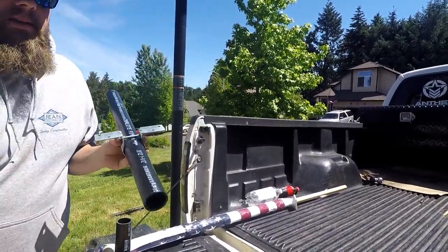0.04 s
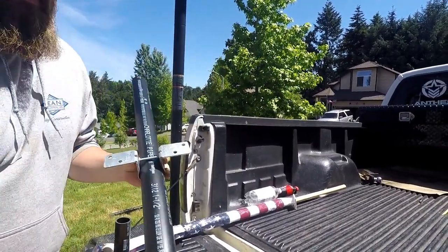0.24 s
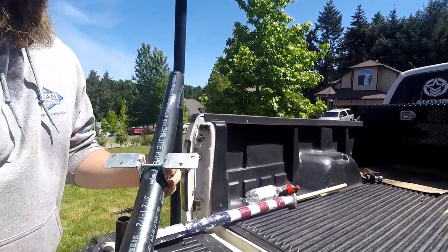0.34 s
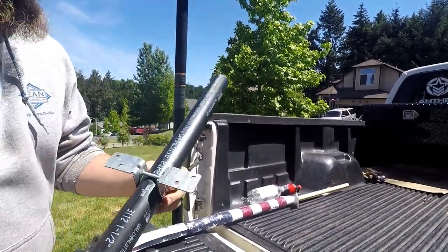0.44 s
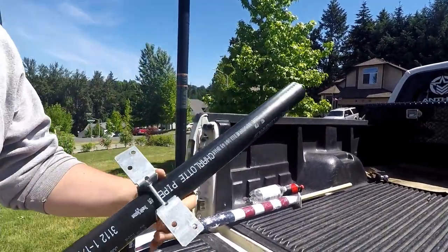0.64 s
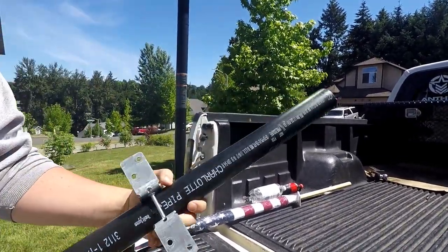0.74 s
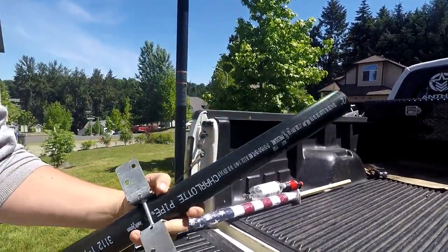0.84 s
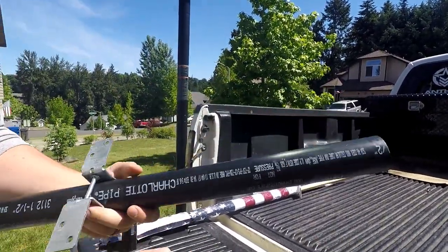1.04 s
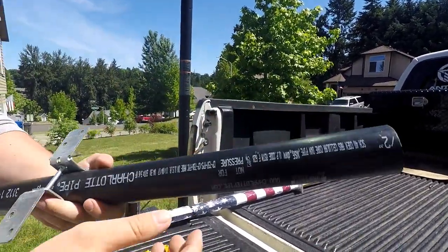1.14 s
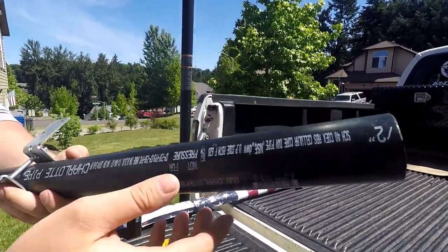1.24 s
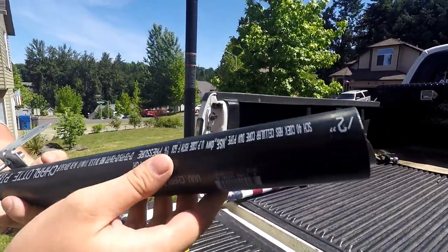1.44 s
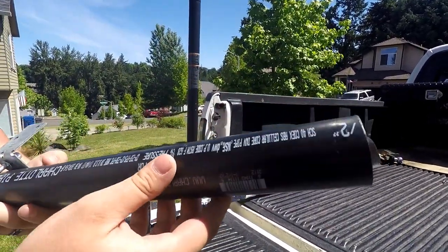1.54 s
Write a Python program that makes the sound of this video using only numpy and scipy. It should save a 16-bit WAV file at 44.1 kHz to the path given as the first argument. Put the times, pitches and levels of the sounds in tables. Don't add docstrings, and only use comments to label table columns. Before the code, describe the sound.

A hollow plastic pipe knocks sharply once, then clatters in a short run of scraping knocks outdoors.

```python
import sys
import numpy as np
from scipy import signal
from scipy.fft import rfft, irfft, next_fast_len
from scipy.io import wavfile
from scipy.ndimage import uniform_filter1d, minimum_filter1d, map_coordinates

SR = 44100
rng = np.random.default_rng(int(sys.argv[2]) if len(sys.argv) > 2 else 0)


def undo_db(level):
    steps = np.asarray(level, float) / 20
    return 10 ** steps


def put_to_file(sound):
    columns = np.atleast_2d(sound).T
    safe = np.clip(columns, -1, 1)
    whole_steps = np.round(safe * 32767)
    wavfile.write(sys.argv[1], SR, whole_steps.astype(np.int16))


N = 70560
STRIKE_T = np.arange(SR // 4) / SR
CLICK_HZ = 5104

# [f/Hz, level/dB per Hz]
WALL_RATTLE = [(350, -3), (700, -9.5), (1600, -11.5), (3000, -17), (4000, -23), (5200, -21), (6900, -33.5),
               (15800, -70.5)]


def unit(x):
    return x / np.sqrt(np.mean(x ** 2) + 1e-20)


def wobble(rate):
    knots = rng.standard_normal(int(N * rate / SR) + 4)
    return map_coordinates(knots, [np.arange(N) * rate / SR])


def filtered(x, response):
    m = next_fast_len(len(x) + 8192)
    spectrum = rfft(x, m) * response(np.fft.rfftfreq(m, 1 / SR))
    return irfft(spectrum, m)[:len(x)]


def noise(points, size=N):
    f, db = np.transpose(points)

    def colour(hz):
        return undo_db(np.interp(np.log(hz + 1), np.log(f + 1), db))

    return unit(filtered(rng.standard_normal(size), colour))


def add(out, s, x):
    part = out[round(s * SR):][:len(x)]
    part += x[:len(part)]


def ring(modes, rise_s, blur=0.):
    hz, db, t60 = np.transpose(modes)[..., None]
    drift = blur * np.cumsum(rng.standard_normal((len(modes), len(STRIKE_T))), 1)
    scatter_db = 1.5 * rng.standard_normal(hz.shape)
    decay = undo_db(db + scatter_db - 60 * STRIKE_T / t60)
    tones = decay * np.sin(2 * np.pi * hz * STRIKE_T + drift)
    return tones.sum(0) * (1 - np.exp(-STRIKE_T / rise_s))


def burst(points, t60):
    grain_db = 1.5 * wobble(500)[:len(STRIKE_T)]
    decay = undo_db(grain_db - 60 * STRIKE_T / t60)
    return noise(points, size=len(STRIKE_T)) * decay * (1 - np.exp(-STRIKE_T / 0.0004))


def outdoors():
    # [f/Hz, level/dB per Hz]
    air = [(120, -23), (200, -5.5), (425, -3), (809, -18), (1100, -18), (2210, -22), (2590, -21),
           (3330, -20.5), (14500, -36.5)]
    # [f/Hz, level/dB per Hz]
    wind = [(8.8, -51), (15, -7), (41, -8.5), (86, -15.5), (119, -23), (200, -37), (260, -76), (440, -120)]
    # [t/s, level/dB]
    gusts = [
        (0.0, -47.5),
        (0.294, -42),
        (0.876, -44.5),
        (1.176, -46.5),
        (1.38, -45.5),
        (1.6, -47.5),
    ]
    # [f/Hz, level/dB]
    machine = [(1900, -78), (2676, -69), (3122, -75), (3865, -77), (4786, -78), (6869, -81)]
    t = np.arange(N) / SR
    gust_db = np.interp(t, *np.transpose(gusts))
    whine = np.zeros(N)
    for hz, db in machine:
        level = undo_db(db + 5 + 4.5 * wobble(36.13))
        drift = 0.085 * np.cumsum(rng.standard_normal(N))
        whine += level * np.sin(2 * np.pi * hz * t + drift)
    hiss = undo_db(-55.5 + 0.2 * wobble(20)) * noise(air)
    buffet_db = -44 + gust_db - gust_db.mean() + 4.2 * wobble(11.03)
    return hiss + undo_db(buffet_db) * noise(wind) + whine


def palms():
    # [t/s, level/dB]
    drag = [
        (0.2, -51.5),
        (0.412, -40),
        (0.842, -27),
        (1.2, -55),
    ]
    # [f/Hz, width/Hz, level/dB]
    cavity = [(110, 26, -7), (180, 64.6, -7.5), (300, 53.5, -5), (396.5, 20.4, -6.5), (459.5, 25, -12),
              (617, 100, -26.5)]
    s, db = np.transpose(drag)
    push_db = np.interp(np.arange(N) / SR, s, db, -90, -90)

    def hollow(f):
        total = 0
        for k, (centre, width, gain_db) in enumerate(cavity):
            damping = 1j * f * width
            total = total + (-1) ** k * undo_db(gain_db) * damping / (centre * centre - f * f + damping)
        return total

    friction = undo_db(4 * wobble(59.79)) * rng.standard_normal(N)
    body = unit(filtered(friction, hollow))
    skin = unit(undo_db(2.7 * wobble(92)) * noise(WALL_RATTLE))
    scrape_db = 1.2 * (push_db - db.max()) - 45
    return undo_db(push_db + 2) * body + undo_db(scrape_db) * skin


def knocks():
    # [t/s, rattle/dB, ring/dB, air note f/Hz, rings free/s]
    blows = [(0.2163, -5.5, 1, 393.2, .022), (0.2442, -18, -9.5, 439, 0.0088),
             (0.256, -49, -17, 395, 0.016), (0.296, -40, -26.5, 385, 0.035), (0.4, -44.5, -40.5, 395, .03),
             (0.4479, -37, -36, 373, 0.01), (0.456, -35.5, -19, 392.7, 0.031),
             (0.494, -49, -20, 390, 0.0078), (0.5079, -31.5, -23, 434.5, 0.039),
             (0.5532, -35, -19.5, 419, 0.014), (0.5743, -37.5, -26, 434, 0.02),
             (0.6531, -26.5, -25.5, 379, 0.017), (0.678, -28, -20.5, 421.4, 0.018),
             (0.7638, -4.5, -12, 300, .01), (0.7645, -5, -1, 408, 0.016), (0.7723, -2, -21, 364, 0.0073),
             (0.778, 2.5, -32, 397, 0.013), (0.7865, -16.5, -3.5, 393, 0.0157),
             (0.8023, -22, -7, 406, .012), (0.818, -25, -6.5, 406, 0.0095),
             (0.8361, -18.5, -12, 325, 0.011), (0.854, -6.5, -6, 338.5, 0.012),
             (0.8684, -12, -5, 402, 0.0097), (0.878, -19.5, -11, 370, 0.0069),
             (0.8905, -23, -6.5, 410, 0.0048), (0.9045, -19.5, -32, 373, 0.013),
             (0.9154, -25, -16, 354, 0.019), (0.9911, -31.5, -34.5, 375, 0.012),
             (1.0006, -27, -32.5, 390, 0.028), (1.052, -39, -42, 374, 0.011)]
    # [f/Hz, level/dB, t60/s]
    wall_modes = [(325, -10, 0.057), (480.5, -12, 0.098), (589, -13, 0.082), (1100, -21, 0.041),
                  (1470, -39, 0.072), (2130, -30, 0.025)]
    out = np.zeros(N)
    for s, rattle_db, pipe_db, hz, free_s in blows:
        grip = undo_db(-60 * np.maximum(0, STRIKE_T - free_s) / 0.023)
        rattle = undo_db(rattle_db - 4.5) * burst(WALL_RATTLE, 0.12)
        air_note = (hz, 0, 0.19)
        pipe = ring([air_note] + wall_modes, 0.0038, blur=0.003)
        add(out, s, rattle + undo_db(pipe_db + 5) * grip * pipe)
    return out


def clicks():
    # [t/s, peak level/dB, brightness/dB an octave]
    contacts = [(0.2177, -11.5, -0.5), (0.2447, -20, -6.5), (0.2624, -19, -9.5), (0.4461, -39.5, -4.5),
                (0.5054, -35.5, -10.5), (0.5531, -36, -8.5), (0.568, -45.5, -2), (0.6543, -43, -16),
                (0.6786, -39, -1), (0.708, -67, 11), (0.7122, -42, 0), (0.7316, -36, -4),
                (0.7643, -4.5, -5), (0.7709, -21, 6.5), (0.7784, -17.5, 13.5), (0.788, -17, 3),
                (0.8228, -18.5, 2), (0.8467, -25, -2), (0.8551, -10, 1), (0.8763, -26.5, 6),
                (0.8695, -15.5, -7), (0.8358, -30.5, 7), (0.9174, -40, 4), (0.9071, -30, -2),
                (0.9129, -25, -4.5), (0.9923, -41, 8), (1.0001, -26.5, -19), (1.0054, -33, 0),
                (1.0553, -58, -22), (1.3524, -55.5, 15), (1.4696, -47.5, -4), (1.573, -50, -1)]
    out, hz = np.zeros(N), np.geomspace(500, 16000, num=40)
    housing_decay = undo_db(-3 - 60 * STRIKE_T / 0.016)
    housing = housing_decay * np.sin(2 * np.pi * 5207 * STRIKE_T)
    peak_db = 16.5 / (1 + ((hz - CLICK_HZ) / 744) ** 2)
    rolloff_db = 16 * np.maximum(0, np.log2(hz / 6000))
    for s, db, tilt_db in contacts:
        shape_db = peak_db + tilt_db * np.log2(hz / CLICK_HZ) - rolloff_db
        add(out, s, undo_db(db) * (burst(np.c_[hz, shape_db], 0.025) + housing))
    return out


def thumps():
    # [t/s, level/dB, f/Hz]
    thuds = [(0.229, -10, 110), (0.223, -12.5, 187.6), (0.257, -21, 266), (0.264, -18, 118.5),
             (0.286, -23, 189), (0.298, -27.5, 121), (0.449, -30, 82.4), (0.504, -22, 169.4),
             (0.555, -23, 171), (0.586, -27.5, 135), (.33, -32, 271), (0.653, -49, 188), (0.679, -36, 288),
             (0.704, -45, 100), (0.763, -7, 297), (0.767, -9, 71), (0.776, 1, 108), (.803, -2, 158),
             (0.811, -8, 300), (0.844, -8, 173.6), (0.867, -12, 199.5), (0.895, -24.5, 69.5),
             (.89, -17.5, 180), (0.916, -10, 325), (0.964, -23.5, 180), (0.992, -33, 180), (1, -44, 101),
             (1.018, -29, 105.4), (1.045, -28, 184), (1.088, -36, 170), (.218, -17, 587), (.656, -30, 622),
             (.68, -28.5, 612), (.787, -8.5, 301), (.866, -9, 622), (.89, -14.5, 547), (.93, -28.5, 160),
             (.944, -23.5, 458), (1.0, -25, 660), (1.4803, -36.5, 384), (1.582, -33.5, 319),
             (1.59, -32, 380)]
    out = np.zeros(N)
    for s, db, hz in thuds:
        t60 = 29.2 / (hz + 60)
        add(out, s, undo_db(db + 2) * ring([(hz, 0, t60)], 0.0031, blur=0.005))
    return out


def bracket():
    # [t/s, level/dB, brightness/dB an octave, held by a finger/0-1]
    clinks = [
        (0.7319, -40.5, -8, 0.2),
        (.744, -39.5, -2.5, 0),
        (0.846, -40.5, 7, 0),
        (.856, -42, 12, 0),
        (0.9996, -38.5, 1, 1),
        (1.007, -44.5, -4, 1),
    ]
    # [f/Hz, level/dB, t60/s]
    free_modes = [(1960, -4.5, 0.041), (2710, -6, 0.28), (3930, 0, 0.3), (5260, 1.5, 0.17),
                  (7200, -12, 0.09), (7970, -5.5, 0.1), (9750, -5.5, 0.088), (11180, -19, 0.039),
                  (13560, -24, 0.085)]
    # [f/Hz, level/dB, t60/s]
    held_modes = [(2850, -2, .045), (3820, -5, .05), (4720, 0, .04), (5230, -2, .045), (8050, -10, .075),
                  (8940, -7, .04), (9650, -8, .05), (13630, -10, .03)]
    # [f/Hz, level/dB per Hz]
    jingle = [(1500, 14), (5200, 3), (9000, -11), (14000, -35), (15500, -23)]
    out = np.zeros(N)

    def tilted(modes, tilt_db):
        return [(hz, db + tilt_db * np.log2(hz / CLICK_HZ), t60) for hz, db, t60 in modes]

    for s, db, tilt_db, held in clinks:
        free_ring = ring(tilted(free_modes, tilt_db), 0.00016, blur=0.08)
        held_ring = ring(tilted(held_modes, tilt_db), 0.0003, blur=0.08)
        plates = (1 - held) * free_ring + held * held_ring
        add(out, s, undo_db(db + 3) * (plates + 0.79 * burst(jingle, 0.039)))
    return out


def fingers():
    # [t/s, level/dB]
    wall_taps = [
        (0.7608, -18.5),
        (1.391, -69),
        (1.470, -41.5),
        (1.481, -52.5),
        (1.492, -47),
    ]
    # [f/Hz, level/dB, t60/s]
    wall_modes = [(398, 11, .045), (905, -10, .04), (1389, 3, .05), (1857, -3, .05), (2330, 1, .045),
                  (2848, -5, .05), (5000, -6, .03)]
    # [t/s, level/dB]
    rim_taps = [
        (1.5815, -54.5),
        (1.586, -52.5),
    ]
    # [f/Hz, level/dB, t60/s]
    rim_modes = [(1351, 2, .07), (1830, 3, .03), (2300, -10, .04), (4156, -4, .05), (5190, -2, .08)]
    out = np.zeros(N)
    for taps, modes in (wall_taps, wall_modes), (rim_taps, rim_modes):
        for s, db in taps:
            tap = ring(modes, 0.000063, blur=0.062) + 0.85 * burst(WALL_RATTLE, 0.057)
            add(out, s, undo_db(db) * tap)
    return out


def scene():
    return (outdoors() + palms() + knocks() + clicks() + thumps() + bracket() + fingers())[None]


def roll_off(x):
    return signal.sosfilt(signal.butter(12, 15970, fs=SR, output="sos"), x)


def record(dry):
    ceiling, squeeze = 0.37, 0.44
    ahead, hold, soft = int(0.0074 * SR), int(0.037 * SR), int(0.0017 * SR)
    need = np.minimum(1, ceiling / (np.abs(dry[0]) + 1e-9)) ** squeeze
    span = ahead + hold + 1
    low = minimum_filter1d(need, span, origin=hold - span // 2)
    gain = uniform_filter1d(low, soft + 1)
    earlier = np.pad(gain, (ahead, 0), 'edge')[:N]
    gain = gain * np.minimum(1, gain / earlier) ** 1.03
    clipped = np.tanh(dry[0] * gain / 1.244) * 1.312
    mix = filtered(clipped, lambda hz: 1 / (1 + (hz / 15200) ** 40))
    return roll_off(mix[None])


dry = scene()
out = record(dry)
put_to_file(out)
```